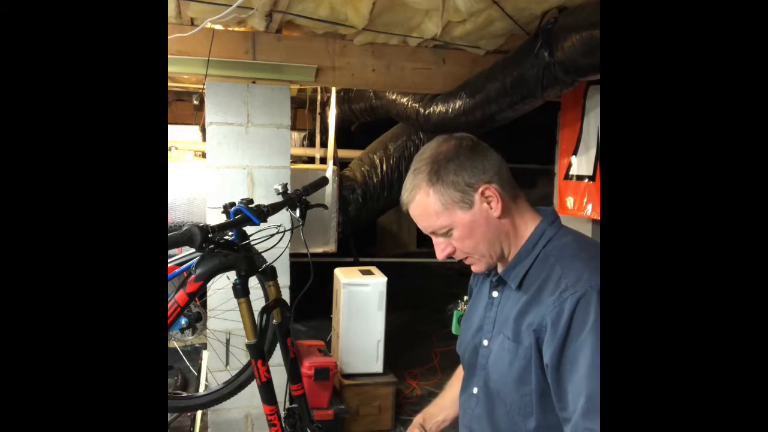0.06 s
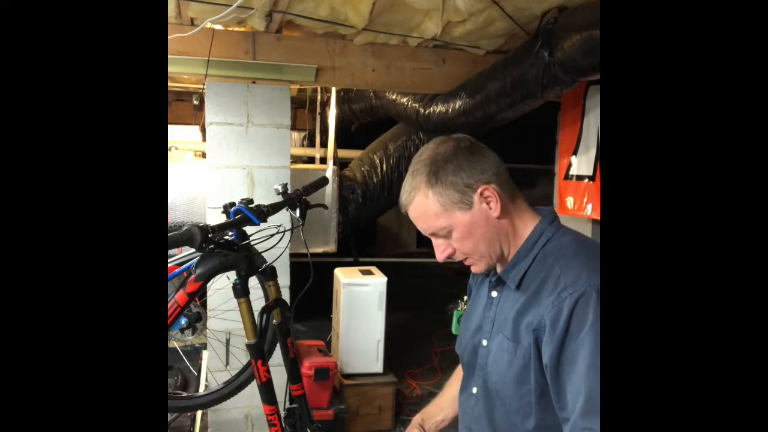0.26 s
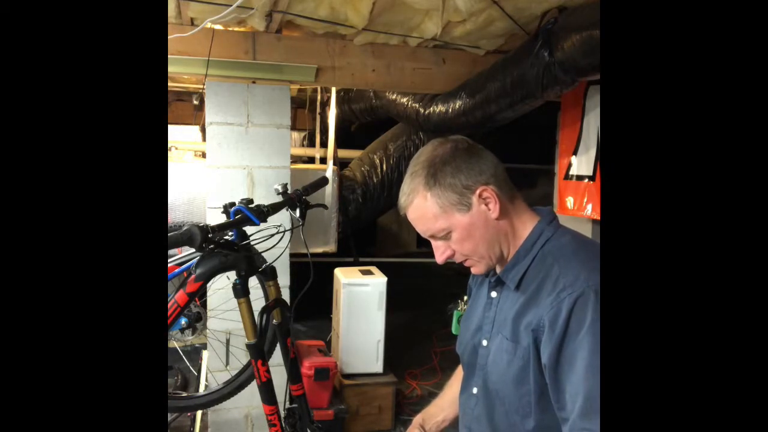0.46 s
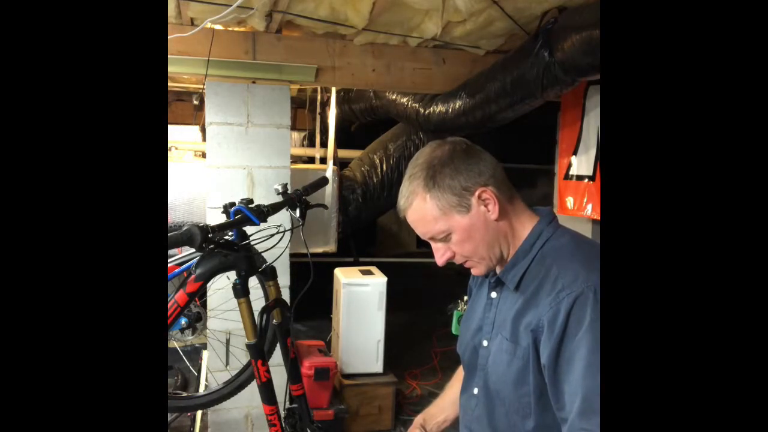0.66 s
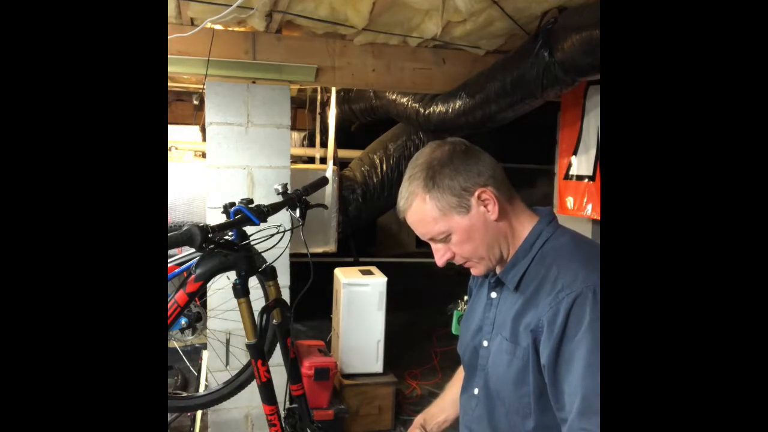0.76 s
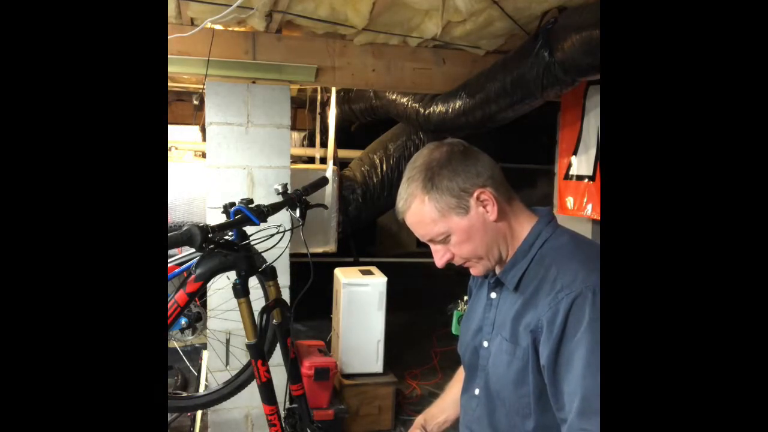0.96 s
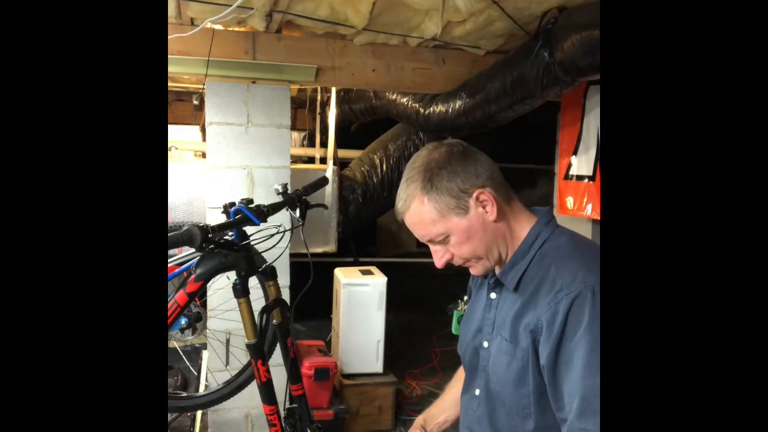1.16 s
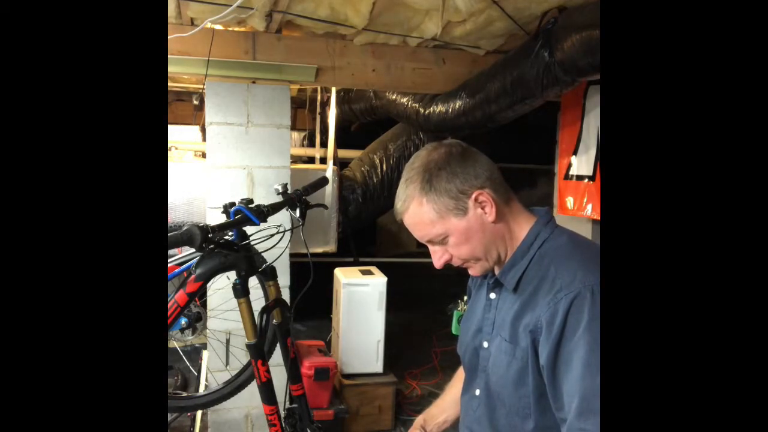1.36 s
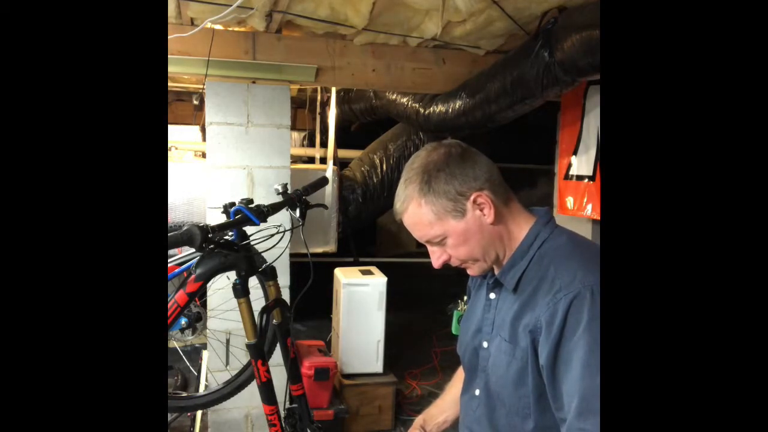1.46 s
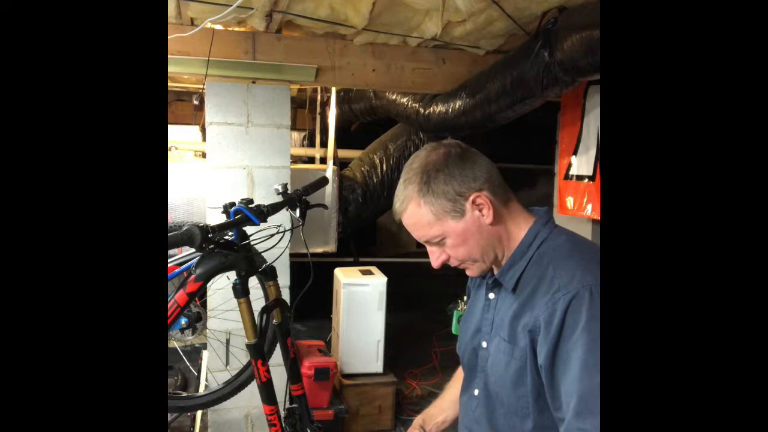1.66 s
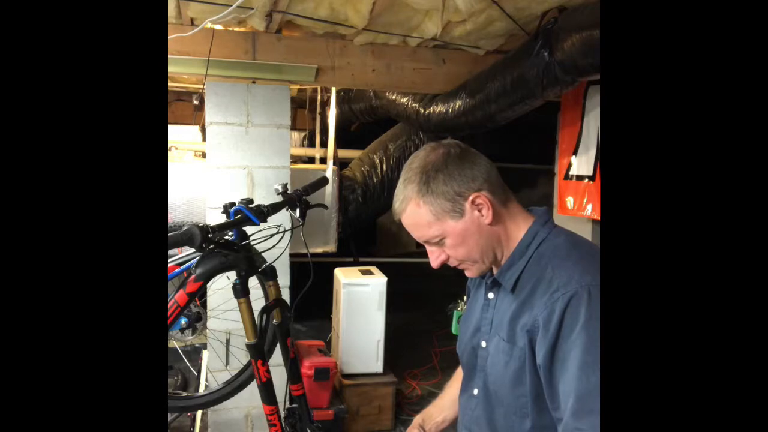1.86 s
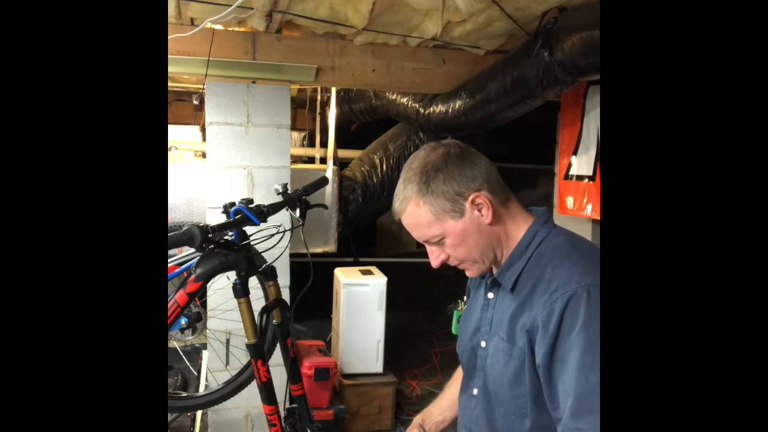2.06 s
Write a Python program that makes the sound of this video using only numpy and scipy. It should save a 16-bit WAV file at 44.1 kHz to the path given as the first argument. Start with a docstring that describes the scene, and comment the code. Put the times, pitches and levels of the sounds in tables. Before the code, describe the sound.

A tire bead pops sharply onto a bicycle rim early on, the wheel ringing briefly; faint compressed-air hiss and low motor hum continue throughout a low basement workshop, picked up close, nearly mono.

```python
"""In a low basement workshop, compressed air hisses steadily into a bicycle tire while a motor hums.
The hiss is colored noise with faint whistles; the background is low noise and wavering tones.
The bead snaps onto the rim with one sharp pop: damped sines for the casing, the ringing wheel and
spokes, then fading noise and two echoes for the room. Half a second later the rubber ticks faintly."""
import sys
import numpy as np
from scipy import signal
from scipy.fft import rfft, irfft
from scipy.io import wavfile

SR = 44100
rng = np.random.default_rng(int(sys.argv[2]) if len(sys.argv) > 2 else 0)


def transcribe(signal):
    """Save signal, clipped to [-1, 1], as a 16-bit WAV file at the path in sys.argv[1]."""
    frames = np.atleast_2d(signal).T
    limited = np.clip(frames, -1, 1)
    pcm = np.round(limited * 32767).astype(np.int16)
    wavfile.write(sys.argv[1], SR, pcm)


N = 92610   # length in samples, 2.1 s
TIME = np.arange(N) / SR


def from_db(db):
    """Turn decibels into a gain."""
    return 10 ** (np.asarray(db) / 20)


def rms_one(x):
    """Scale a sound to an rms level of 1."""
    return x / np.sqrt(np.mean(x ** 2) + 1e-20)


def at_hz(points, hz):
    """Read a table of (frequency, value) between its points, on a log-frequency axis."""
    table_hz, values = np.transpose(points)
    return np.interp(np.log(np.maximum(hz, 1)), np.log(table_hz), values)


def butter(x, hz, kind, order=2):
    """Butterworth filter, which passes or cuts a range of pitches smoothly."""
    safe_hz = np.clip(hz, 10, SR / 2 - 1000)
    sections = signal.butter(order, safe_hz, kind, fs=SR, output="sos")
    return signal.sosfilt(sections, x + 1e-18)


def noise(spectrum):
    """Steady noise of a given color, rms 1: white noise reshaped frequency by frequency."""
    hz = np.arange(N // 2 + 1) * SR / N
    white = rfft(rng.standard_normal(N))
    return rms_one(irfft(white * from_db(at_hz(spectrum, hz)), N))


def resonant_noise(hz, width):
    """White noise through one resonance, rms 1; a narrower width in Hz sounds more like a tone."""
    radius = np.exp(-np.pi * width / SR)
    feedback = [1, -2 * radius * np.cos(2 * np.pi * hz / SR), radius ** 2]
    return rms_one(signal.lfilter([1, 0, -1], feedback, rng.standard_normal(N)))


def since(s):
    """Seconds since a moment, zero before it."""
    return np.maximum(TIME - s, 0)


def struck(modes, s):
    """Damped sines set off together, as in a struck body, with alternating signs."""
    t = since(s)
    out = 0
    for k, (hz, db, t60) in enumerate(modes):
        fading = from_db(db - 60 * t / t60)
        out = out + (-1) ** k * fading * np.sin(2 * np.pi * hz * t)
    return out


# Color of the air rushing through valve and hose.
# Each row: frequency in Hz, relative level in dB per Hz.
JET_COLOR = [(1000, -16), (1750, -11.5), (2400, -4), (3050, -8), (3600, -5), (4900, -6), (6800, -3),
             (8300, -4), (9500, -5.5), (11000, -2), (11900, -3), (13500, 0.5), (15700, -1)]
# Faint whistling resonances of the valve.
# Each row: frequency in Hz, width in Hz, level in dB.
VALVE_WHISTLES = [(2590, 170, -82.5), (6080, 150, -62.5), (7350, 130, -68), (7610, 110, -62.5),
                  (11700, 160, -61), (12200, 110, -60), (12630, 110, -66), (12700, 120, -60.5)]
HISS_DB = -46
SIDE_DB = -42   # left-right difference noise relative to the hiss, before its low part is removed
# nearby surfaces: how many, the longest delay, the level of each relative to the jet
SURFACE_COUNT, SURFACE_DELAY_S, SURFACE_DB = 10, .016, -16


def air_hiss():
    """A bright jet combed by nearby surfaces, with whistles;
    a very faint separate treble noise differs between left and right."""
    jet = noise(JET_COLOR)
    delays_s = rng.uniform(.1, 1, SURFACE_COUNT) * SURFACE_DELAY_S
    lags = (delays_s * SR).astype(int)
    bounced = sum(np.roll(jet, lag) for lag in lags)
    jet = rms_one(jet + from_db(SURFACE_DB) * bounced)
    whistles = sum(from_db(db) * resonant_noise(hz, width) for hz, width, db in VALVE_WHISTLES)
    mid = from_db(HISS_DB) * jet + whistles
    # separate noise, added on the left and subtracted on the right
    side = from_db(HISS_DB + SIDE_DB) * butter(noise(JET_COLOR), 5200, "high", order=8)
    return np.array([mid + side, mid - side])


# Color of the workshop's rumble.
# Each row: frequency in Hz, relative level in dB per Hz.
RUMBLE_COLOR = [(22, -42), (38, -14), (58, 1), (85, 1), (130, -5.5), (180, -7), (270, -9), (340, -7.5),
                (520, -8), (640, -16), (1000, -19.5), (1600, -26.5), (3000, -36)]
# The motor's hum.
# Each row: frequency in Hz, level of its steady part in dB.
MOTOR_HUM = [(59.8, -66), (120, -56.5), (883, -74.5)]
RUMBLE_DB = -53
HUM_WAVER, HUM_WAVER_HZ = 0.58, 4.5   # unsteady part as a share of the steady one, and its width


def workshop():
    """Low noise for the rumble; sines plus narrow noise at the same pitches make the hum waver."""
    out = from_db(RUMBLE_DB) * noise(RUMBLE_COLOR)
    for hz, db in MOTOR_HUM:
        steady = np.sqrt(2) * np.sin(2 * np.pi * (hz * TIME + rng.random()))   # rms 1
        waver = HUM_WAVER * resonant_noise(hz, HUM_WAVER_HZ)
        out = out + from_db(db) * (steady + waver)
    return out


# Heavily damped modes of casing and rim.
# Each row: frequency in Hz, level in dB within the pop, time to fall by 60 dB in seconds.
CASING_MODES = [(275, -17.5, 0.075), (712, -10, 0.038), (1084, -2.5, 0.037), (1394, -6, 0.018),
                (1740, -8, 0.015), (2300, -5.5, 0.013), (3150, -5, 0.0047), (4830, -6, 0.0013)]
POP_S = .2165   # the moment the bead snaps into its seat
CONTACT_HZ = 5600   # the rubber softens the snap above this
# bright edge of the snap: level within the pop, time to fall by 60 dB, lower limit
SNAP_DB, SNAP_T60_S, SNAP_LOW_HZ = -32, .04, 5500


def casing_crack():
    """Casing and rim jump into short damped vibration, with a bright edge of fading noise."""
    bright = butter(rng.standard_normal(N), SNAP_LOW_HZ, "high")
    fading = from_db(SNAP_DB - 60 * since(POP_S) / SNAP_T60_S)
    edge = bright * (TIME > POP_S) * fading
    return butter(struck(CASING_MODES, POP_S), CONTACT_HZ, "low") + edge


# Ringing of the wheel, mostly the air ring in the tire at multiples of about 158 Hz.
# Each row: frequency in Hz, level in dB within the pop, time to fall by 60 dB in seconds.
WHEEL_MODES = [(159.5, -29, .64), (308, -29, .38), (348, -22.5, .19), (473, -18, .23), (608, -18, .19),
               (818, -20, .12), (985, -17, .11), (1078, -17, .11), (1138, -27, .3), (1172, -22, .21),
               (1288, -27, .21), (1362, -20, .12), (1482, -25, .22), (1710, -25, .15)]
# The spokes sing on faintly.
# Each row: frequency in Hz, level in dB within the pop, time to fall by 60 dB in seconds.
SPOKE_MODES = [(364, -42, .9), (372, -38, 0.98), (399, -46.5, 1.0), (743, -39, 0.69), (920, -46.5, 1),
               (1070, -48, 0.95), (1325, -40, 0.48), (1502, -38.5, 0.58), (1940, -37.5, 0.37)]


def wheel_ring():
    """The snap sets off the air ring in the tire and the spokes, which ring on as damped sines."""
    return struck(WHEEL_MODES, POP_S) + struck(SPOKE_MODES, POP_S)


# Color of the snap scattered by nearby things.
# Each row: frequency in Hz, relative level in dB per Hz.
SCATTER_COLOR = [(90, -30), (180, -4), (280, -5), (420, -12), (620, 2.5), (860, -6), (1120, -6), (1400, -1),
                 (1800, -6.5), (2300, -8), (3100, -12), (4200, -19), (7000, -26), (15000, -45.5)]
SCATTER_DELAY_S, SCATTER_RISE_S = 0.00057, 0.0015   # start after the snap, time constant of the rise


def reflections(t60s):
    """Dense reflections of the snap as noise, each half octave dying at its own rate."""
    t = since(POP_S + SCATTER_DELAY_S)
    sources = noise(SCATTER_COLOR), noise(SCATTER_COLOR)   # neighboring bands take turns
    edges = 70 * 2 ** (np.arange(17) / 2)
    out = 0
    for k, (low, high) in enumerate(zip(edges, edges[1:])):
        band = butter(sources[k % 2], [low, high], "band")
        t60 = at_hz(t60s, np.sqrt(low * high))
        out = out + band * from_db(-60 * t / t60)
    return out * (1 - np.exp(-t / SCATTER_RISE_S))


# How long the scattered snap lasts.
# Each row: frequency in Hz, time to fall by 60 dB in seconds.
SCATTER_DECAY = [(200, .13), (1000, 0.072), (3000, 0.11), (12000, 0.085)]
# How long the room's tail lasts.
# Each row: frequency in Hz, time to fall by 60 dB in seconds.
TAIL_DECAY = [(150, 0.48), (500, 0.39), (1400, 0.43), (3000, 0.28), (10000, 0.077)]
# Distinct wall echoes of the crack.
# Each row: delay in seconds, level in dB relative to the crack, lowest and highest frequency in Hz.
WALL_ECHOES = [(0.0211, -14, 300, 1300), (0.06, -19.5, 1400, 2820)]
SCATTER_DB, TAIL_DB = -10.5, -27   # within the pop


def room_answer(crack):
    """Short scattering, a longer tail, and delayed copies of the crack narrowed to a band."""
    out = from_db(SCATTER_DB) * reflections(SCATTER_DECAY)
    out = out + from_db(TAIL_DB) * reflections(TAIL_DECAY)
    for delay, db, low, high in WALL_ECHOES:
        delayed = np.interp(TIME - delay, TIME, crack)
        out = out + from_db(db) * butter(delayed, [low, high], "band")
    return out


POP_DB = -4.5   # level of the whole pop
POP_LOW_HZ = 126   # the narrow tire radiates little below this


def bead_pop():
    """The crack of the casing, the ring of wheel and spokes, and the room's answer."""
    crack = casing_crack()
    pop = crack + wheel_ring() + room_answer(crack)
    return from_db(POP_DB) * butter(pop, POP_LOW_HZ, "high", order=4)


# The dull thud and tick of the rubber.
# Each row: frequency in Hz, level in dB within the tick, time to fall by 60 dB in seconds.
TICK_MODES = [(72, -2, 0.059), (820, 0, 0.019), (1060, -1.5, .02)]
TICK_S, TICK_DB = .763, -44.5   # moment, level of the whole tick


def rubber_tick():
    """A small dull slip of the bead, made of short damped sines."""
    return from_db(TICK_DB) * struck(TICK_MODES, TICK_S)


def scene():
    """Everything in the middle but for a very faint left-right difference in the treble noise."""
    return air_hiss() + workshop() + bead_pop() + rubber_tick()


CUTOFF_HZ = 15760


def record(dry):
    """Cut the top steeply with an elliptic low-pass filter."""
    sections = signal.ellip(14, .1, 70, CUTOFF_HZ, fs=SR, output="sos")   # ripple, rejection in dB
    return signal.sosfilt(sections, dry)


dry = scene()
out = record(dry)
transcribe(out)
```